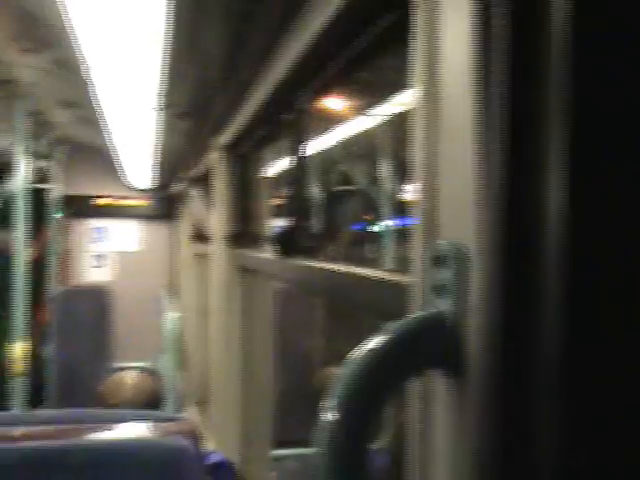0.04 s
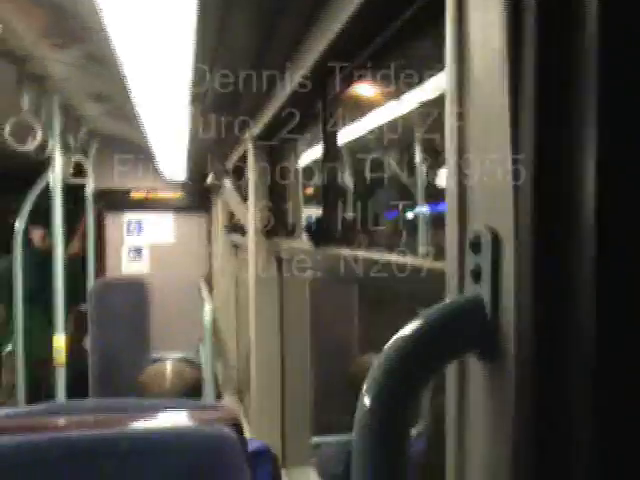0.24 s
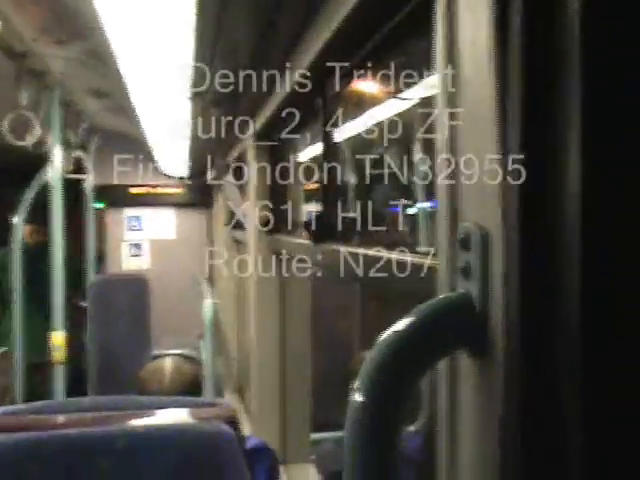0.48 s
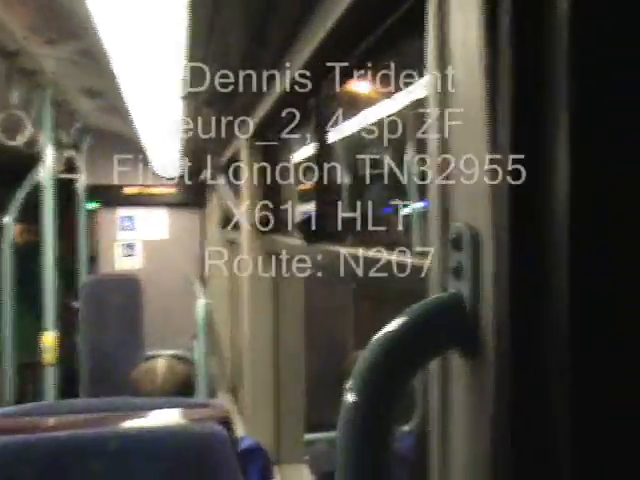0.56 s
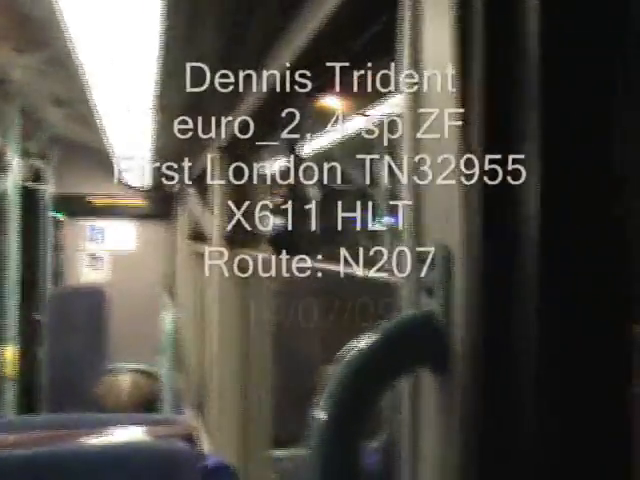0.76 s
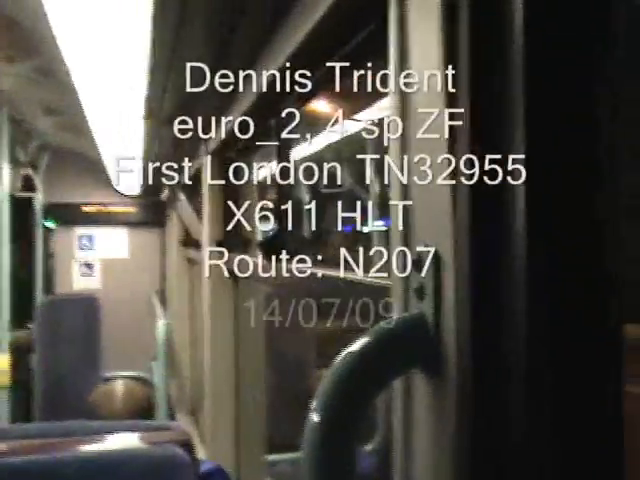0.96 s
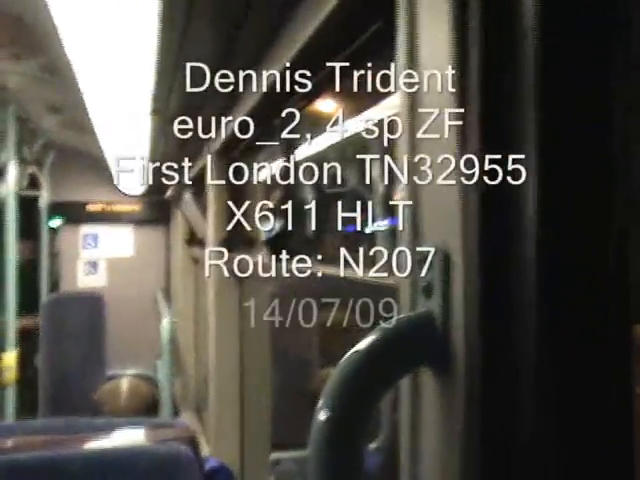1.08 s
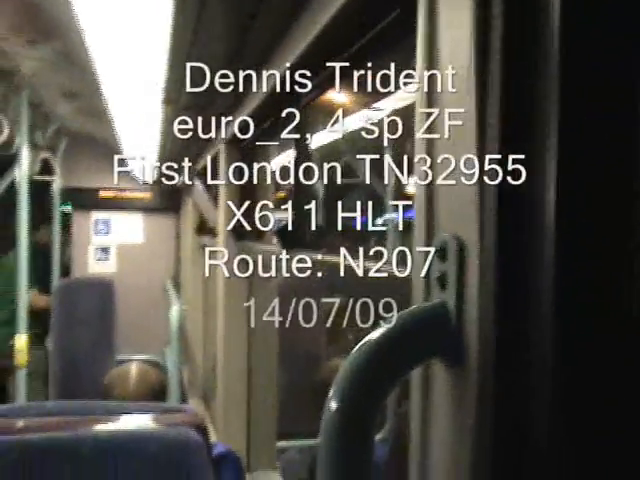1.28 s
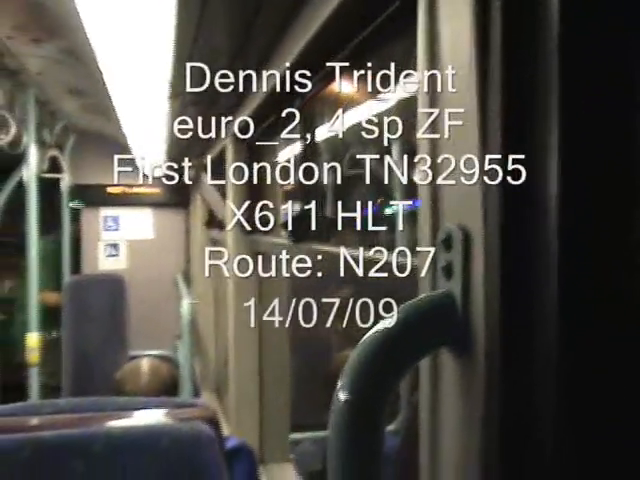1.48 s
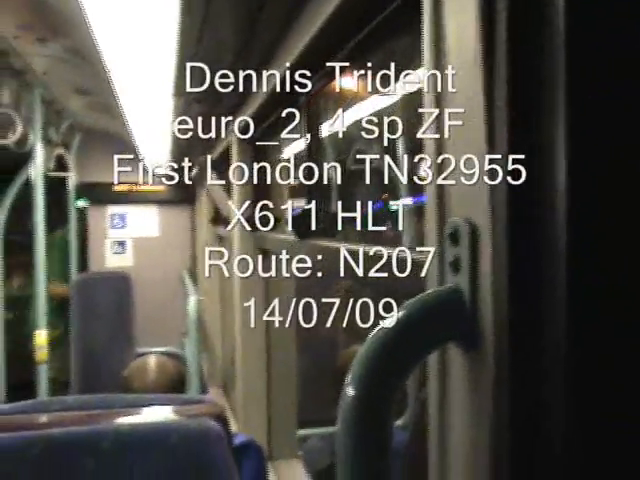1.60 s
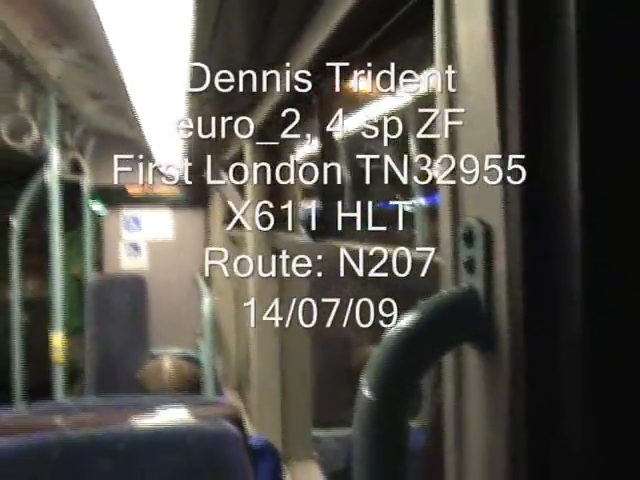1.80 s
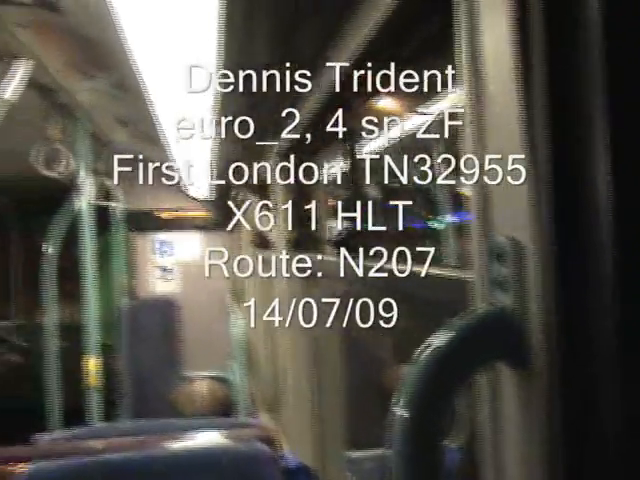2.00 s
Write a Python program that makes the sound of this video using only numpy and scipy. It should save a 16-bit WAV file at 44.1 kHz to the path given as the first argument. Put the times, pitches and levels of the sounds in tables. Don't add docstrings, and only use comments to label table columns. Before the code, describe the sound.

A bus diesel engine heard from a seat inside. Sound fades in at 0.14 seconds; a dull clunk rings at 0.23 over throbbing idle, body rumble and faint airy hiss. Light panel ticks come around 0.33-0.57, with a thin whistle from 0.55 fading by 1.3. From 1.3 the engine climbs, steeply after 1.7, with whine, floor drone and dense rattling; an air puff at 1.8. It ends still rising near 2.05.

```python
import sys
import numpy as np
from scipy import signal
from scipy.fft import rfft, irfft
from scipy.io import wavfile
from scipy.ndimage import uniform_filter1d

SR = 44100
rng = np.random.default_rng(int(sys.argv[2]) if len(sys.argv) > 2 else 0)


def boost_factor(decibels):
    exponent = np.asarray(decibels, float) / 20
    return 10 ** exponent


def master(y):
    cut = np.clip(np.atleast_2d(y).T, -1, 1)
    pcm = np.round(cut * 32767)
    wavfile.write(sys.argv[1], SR, pcm.astype(np.int16))


N = 90272
T = np.arange(N) / SR


def rms_one(x):
    return x / np.sqrt(np.mean(x ** 2) + 1e-20)


def at_hz(points, hz):
    f, v = np.transpose(points)
    return np.interp(np.log(hz + 20), np.log(f + 20), v)


def drift(rate_hz):
    hop = 40
    r = np.exp(-2 * np.pi * rate_hz * hop / SR)
    slow = signal.lfilter([1], [1, -2 * r, r * r], rng.standard_normal(N // hop + 2002))[2000:]
    return np.interp(np.arange(N) / hop, np.arange(len(slow)), rms_one(slow - slow.mean()))


def resonate(x, hz, width_hz):
    r = np.exp(-np.pi * width_hz / SR)
    poles = [1, -2 * r * np.cos(2 * np.pi * hz / SR), r * r]
    return signal.lfilter([(1 - r * r) / 2, 0, (r * r - 1) / 2], poles, x + 1e-18)


def rung_noise(peaks):
    white = rng.standard_normal(N)
    out = 0
    for k, (hz, width_hz, db) in enumerate(peaks):
        out = out + (-1) ** k * boost_factor(db) * rms_one(resonate(white, hz, width_hz))
    return rms_one(out)


# (frequency [Hz], correlation [-1 to 1])
LIKENESS = [(60, 0.82), (150, 0.83), (300, 0.61), (550, 0.4), (1000, 0.86), (3000, 0.8), (8000, 0.73),
            (15000, 0.66)]


def noise(spectrum, patchy_db):
    out, together, edges = 0, drift(6), np.geomspace(20, 17000, 27)
    white = rng.standard_normal((2, 2, N))
    for k, (low, high) in enumerate(zip(edges, edges[1:])):
        hz = np.sqrt(low * high)
        if hz < spectrum[0][0] / 2:
            continue
        band = signal.butter(2, [low, high], "band", fs=SR, output="sos")
        mid, side = signal.sosfilt(band, white[k % 2])
        alike = np.clip(at_hz(LIKENESS, hz), 0, 1)
        gain = boost_factor(at_hz(spectrum, hz) + patchy_db * (0.077 * together + drift(5.6)))
        out = out + gain * (np.sqrt(1 + alike) * mid + np.sqrt(1 - alike) * side * [[1], [-1]])
    return rms_one(out)


def burst(start_s, attack_s, decay_s, db):
    t = np.maximum(T - start_s, 0)
    return boost_factor(db) * np.minimum(t / attack_s, 1) * np.exp(-np.maximum(t - attack_s, 0) / decay_s)


# (time [s], gearbox tone [Hz], gearbox tone [dB], firing tone [dB], second order [dB], load [dB])
ENGINE = [(.2, 136.1, -30, -34, -32, 2), (0.332, 137.4, -52, -42, -33, 10),
          (0.439, 135.6, -32, -33, -35.5, 2.5), (.64, 134.1, -36.5, -36.5, -35, 4),
          (1.12, 133.9, -29.5, -31, -39, 4.5), (1.3, 137.4, -35, -32, -34, 3),
          (1.432, 146.9, -25, -33, -33, 3), (1.549, 153.7, -20.5, -32, -41, 5),
          (1.698, 160.7, -22, -34, -51, -1), (1.722, 161.6, -19.5, -37, -40, 3),
          (1.741, 174, -36, -32, -42, 12), (1.765, 194.4, -27.5, -33, -40, 2),
          (1.84, 195.7, -30, -26.5, -34.5, 11), (1.899, 208.5, -25.5, -40, -23.5, 5.5),
          (1.949, 212.5, -18, -28, -52, -0.5), (2.009, 212, -24, -28, -27.5, 4),
          (2.045, 216.3, -26, -36, -19, 1)]
# (time [s], firing rate [Hz])
FIRING = [
    (.2, 30.11),
    (1.1, 29.88),
    (1.3, 30.6),
    (1.43, 32.36),
    (1.56, 34.24),
    (1.69, 35.69),
    (1.82, 40.5),
    (1.95, 45.27),
    (2.05, 48.14),
]


def engine_state():
    s, *columns = np.transpose(ENGINE)
    rate = np.interp(T, *np.transpose(FIRING))
    return rate, np.cumsum(rate) / SR, [np.interp(T, s, c) for c in columns]


# (multiple of firing rate [1], level re firing tone [dB])
LOW_ORDERS = [(3, -5), (4, -11.5), (5, -8.5)]
# (frequency [Hz], width [Hz], level [dB])
CABIN = [(224.3, 23.6, -1.5), (275.2, 19, -6), (297.4, 22, -0.5), (327.4, 33.3, -1), (446.8, 21.5, -2.5),
         (416, 35, -9.5), (643, 59, -14.5), (1001, 47, -13.5), (1753, 71, -24.5), (2190, 200, -26)]


def tones(turns, rate, gear_hz, gear_db, firing_db, second_db):
    wobble_hz = 19.7

    def order(k):
        return np.sqrt(2) * np.sin(2 * np.pi * (k * turns + rng.random()))

    out = boost_factor(firing_db) * order(1) + boost_factor(second_db) * order(2)
    for k, db in LOW_ORDERS:
        out += boost_factor(firing_db.mean() + db - 0.5 * drift(wobble_hz)) * order(round(k))
    for k in range(6, 17):
        lift = sum(boost_factor(db) / (1 + (2 * (k * rate - hz) / w) ** 2) for hz, w, db in CABIN)
        out += boost_factor(-37 + 3.5 * drift(wobble_hz)) * lift * order(k)
    gear_phase = 2 * np.pi * np.cumsum(gear_hz) / SR
    overtone_db = -22
    gear = np.sin(gear_phase) + boost_factor(overtone_db) * np.sin(2 * gear_phase)
    return out + boost_factor(gear_db) * np.sqrt(2) * gear


CYLINDERS_DB = [2, -1.5, 1.5, -0.5, 3.9, 0.5]


def firings(turns, jitter_s, spread_db):
    at = np.flatnonzero(np.diff(np.floor(turns)))
    draw = rng.standard_normal((len(at), 2))
    clicks = np.zeros(N)
    where = np.clip(at + draw[:, 0] * jitter_s * SR, 0, N - 1).astype(int)
    clicks[where] = boost_factor(np.resize(CYLINDERS_DB, len(at)) + spread_db * draw[:, 1])
    return clicks


def thump(turns):
    push = rms_one(firings(turns, jitter_s=0.000619, spread_db=3)) + rng.standard_normal(N)
    rung = sum((-1) ** k * boost_factor(db) * resonate(push, hz, w) for k, (hz, w, db) in enumerate(CABIN))
    return boost_factor(-32) * rms_one(rung)


# (frequency [Hz], density [dB per Hz])
KNOCK = [(700, -5), (1500, 2), (2500, -14), (4500, -9.5), (7000, -16.5), (9000, -53.5), (16000, -33)]


def knock(turns, load_db):
    decay_s, level_db, load_share = 0.015, -43, 0.6
    fall = np.exp(-1 / (decay_s * SR))
    late = turns + .3
    gate = signal.lfilter([1], [1, -fall], firings(late, jitter_s=0.0033, spread_db=0.5))
    return boost_factor(level_db + load_share * load_db) * rms_one(gate) * noise(KNOCK, patchy_db=-0.5)


# (time [s], frequency [Hz], level [dB])
DRONE = [
    (1.15, 309.5, -39),
    (1.224, 305, -26),
    (1.258, 322.3, -31.5),
    (1.38, 307, -35),
    (1.42, 323.2, -27.5),
    (1.574, 308.6, -36.5),
    (1.818, 331.2, -30.5),
    (1.858, 314.2, -29),
    (1.97, 330.7, -34),
]


def drone():
    s, hz, db = np.transpose(DRONE)
    edge_s, wobble_db = .05, 4
    edge = np.interp(T, [s[0] - edge_s, s[0], s[-1], s[-1] + edge_s], [0, 1, 1, 0])
    level = boost_factor(np.interp(T, s, db) + wobble_db * drift(15.3))
    phase = 2 * np.pi * np.cumsum(np.interp(T, s, hz)) / SR
    return edge * level * np.sqrt(2) * np.sin(phase)


# (time [s], peak level [dB], squeak [Hz], body re
# peak [dB])
PANEL_TAPS = [(0.3341, -39, 4650, 1), (0.4475, -39, 4650, -3), (0.4591, -34, 4650, -2),
              (0.482, -41, 4600, 1), (0.4935, -35, 4650, -2), (0.5147, -36.5, 4650, -2),
              (0.5275, -36.5, 4600, -1), (0.566, -47, 4600, 8), (1.1957, -35, 4650, 1),
              (1.294, -35, 4650, 2), (1.3619, -38, 4650, 0), (1.3928, -36, 4600, 0),
              (1.4251, -32.5, 4720, 5), (1.4463, -36, 4744, -7), (1.4574, -31.5, 4700, 2),
           (1.4757, -34.5, 4631, 5), (1.4884, -32, 4700, 2), (1.508, -36, 4625, 5),
           (1.52, -32.5, 4690, 2.5), (1.541, -41, 4750, 9.5), (1.549, -35, 4620, 3.5),
           (1.572, -36, 4620, 2), (1.5804, -33, 4600, 1), (1.589, -44, 4700, -3), (1.5974, -31, 4687, 3),
           (1.61, -31.5, 4600, 4), (1.6284, -34, 4622, -2), (1.6418, -34, 4650, 6), (1.6693, -33, 4720, 0),
           (1.6927, -34.5, 4657, 4.5), (1.6992, -34.5, 4600, 7.5), (1.7192, -34, 4725, 7),
           (1.7461, -29, 4620, -5), (1.772, -30, 4530, 1), (1.7964, -36, 4470, 5), (1.8616, -43, 4380, -5),
           (1.8852, -30.5, 4470, -0.5), (1.9096, -41, 4500, 2), (1.9303, -33.5, 4400, -1),
           (1.9536, -34, 4400, 4), (1.963, -35, 4360, 4), (1.975, -33.5, 4610, 5), (1.985, -37, 4435, 3),
           (2.0115, -36.5, 4345, 3), (2.0374, -41, 4480, -2)]
# (frequency ratio [1], level [dB])
SQUEAK = [(1.007, -1.5), (1.33, -9), (1.57, -10)]
# (frequency [Hz], width [Hz], level [dB])
PANEL = [(1730, 200, -1), (2000, 300, -4), (2730, 200, -2), (3050, 250, -4), (3700, 350, -7),
         (5670, 200, -10), (6400, 250, -9), (6820, 200, -11), (7330, 150, -10)]
BUZZ_HZ = [1580, 7350]


def panel():
    s, db, hz, body_db = np.transpose(PANEL_TAPS)
    draw = rng.standard_normal((len(s), len(SQUEAK)))
    at = (s * SR).astype(int)
    clicks = np.zeros(N)
    clicks[at] = boost_factor(db + body_db)
    band = signal.butter(3, BUZZ_HZ, "band", fs=SR, output="sos")
    buzz = signal.sosfilt(band, rng.standard_normal(N))
    tap_s, squeak_s, rise, spread_db = 0.006, .0075, .15, 1.5
    gate = signal.lfilter([1], [1, -np.exp(-1 / (tap_s * SR))], uniform_filter1d(clicks, size=45))
    out = gate * (boost_factor(-9) * rms_one(buzz) + boost_factor(-2.5) * rung_noise(PANEL))
    t = np.arange(int(squeak_s * SR)) / SR
    turns = hz[:, None] * (t + rise * (t * t / (2 * squeak_s) - t / 2))
    shape = np.sin(np.pi * np.sqrt(t / squeak_s)) ** 2
    where = np.minimum(at[:, None] + np.arange(len(t)), N - 1)
    for k, (ratio, level_db) in enumerate(SQUEAK):
        peak = boost_factor(db + level_db + spread_db * draw[:, k])[:, None]
        np.add.at(out, where, peak * shape * np.sin(2 * np.pi * ratio * turns))
    return signal.sosfilt(signal.butter(6, 7800, fs=SR, output="sos"), out)


# (frequency [Hz], density [dB per Hz])
CLUNK_COLOUR = [(500, -25), (1000, -6), (1300, 0), (2100, 0), (3500, -9), (6000, -28), (16000, -60)]
# (frequency [Hz], width [Hz], level [dB])
CLUNK_RINGS = [(1030, 70, -1), (1230, 45, 2), (1700, 130, -5), (1890, 96, 1.5), (2710, 65, -12),
               (3640, 97, -11)]


def clunks():
    at_s, attack_s, decay_s = .23, .014, .045
    dull = noise(CLUNK_COLOUR, patchy_db=.5)
    ringing = burst(at_s, attack_s, decay_s, db=-32) * rung_noise(CLUNK_RINGS)
    knocks = burst(at_s, attack_s, decay_s, db=-28.5) + burst(0.62, 0.0088, 0.011, db=-42)
    return ringing + knocks * dull


# (frequency [Hz], density [dB per Hz])
PUFF_COLOUR = [(700, -8), (2200, 1), (4000, -6), (8000, -13), (12000, -17), (16000, -24)]


def puff():
    return burst(1.806, attack_s=.003, decay_s=.016, db=-26) * noise(PUFF_COLOUR, patchy_db=.5)


def whistle(hz, width_hz, db, times_s):
    once = resonate(rng.standard_normal(N), hz, width_hz)
    thin = rms_one(resonate(once, hz, width_hz))
    return np.interp(T, times_s, [0, 1, 1, 0]) * boost_factor(db + 2.5 * drift(20)) * thin


# (time [s], level [dB])
AIR = [(.14, -44.5), (.2, -45.5), (.36, -46.5), (.42, -53), (.535, -48.5), (.58, -47.5), (.9, -45),
       (1.1, -46.5), (1.3, -46), (1.4, -48.5), (1.8, -49), (1.86, -45), (1.9, -67), (2.04, -58)]
# (frequency [Hz], density [dB per Hz])
LEAK_COLOUR = [(3000, -30), (5000, -1.5), (7000, 0.5), (8300, -5.5), (10500, -4.5), (13000, -23.5),
               (16000, -17)]
# start, full, fall and end [s]
WHISTLE_TIMES_S = [.54, 0.591, .92, 1.299]


def leak():
    hiss = boost_factor(np.interp(T, *np.transpose(AIR)) + 3) * noise(LEAK_COLOUR, patchy_db=1.5)
    valve = whistle(7012, 440, -49.5, WHISTLE_TIMES_S)
    intake = whistle(9400, 310, -56.5, [1.54, 1.59, 1.82, 1.88])
    return hiss + valve + intake


# (frequency [Hz], density [dB per Hz])
BODY = [(22, -18), (140, -3), (300, -10), (560, -16), (2000, -24.5), (4200, -33.5), (8000, -44.5),
        (16000, -52.5)]


def body(load_db):
    return boost_factor(-29 + 0.31 * load_db) * noise(BODY, patchy_db=1)


def scene():
    rate, turns, (gear_hz, gear_db, firing_db, second_db, load_db) = engine_state()
    engine = tones(turns, rate, gear_hz, gear_db, firing_db, second_db)
    engine = engine + drone() + thump(turns) + knock(turns, load_db)
    return engine + body(load_db) + clunks() + puff() + panel() + leak()


# (frequency [Hz], left minus right [dB])
TILT = [(60, 2), (130, 4), (290, 6.5), (640, 6), (1410, 1), (3100, -4), (6820, -1.5), (15000, 2)]
# (frequency [Hz], left lead [rad])
LEAD = [(20, 0), (340, 1.2), (780, -.6), (2840, -.3), (4050, .15), (8350, -.1), (15300, -.1)]


def ports(dry):
    hz = np.fft.rfftfreq(2 * N, 1 / SR)
    half = boost_factor(at_hz(TILT, hz) / 2) * np.exp(.5j * at_hz(LEAD, hz)) + 0j
    mirrored = np.hstack([dry, dry[:, ::-1]])
    return irfft(rfft(mirrored) * np.array([half, 1 / half]) * (hz < 15800))[:, :N]


def band_limit(x):
    return signal.sosfilt(signal.butter(12, 15770, fs=SR, output="sos"), x)


def record(dry):
    ceiling, fade_start_s, fade_s, end_s = .5, .134, .021, .003
    heard = ceiling * np.tanh(ports(dry) / ceiling)
    fade_in = np.clip((T - fade_start_s) / fade_s, 0, 1)
    fade_out = np.minimum((T[-1] - T) / end_s, 1)
    return band_limit(heard * fade_in * fade_out)


dry = scene()
out = record(dry)
master(out)
```